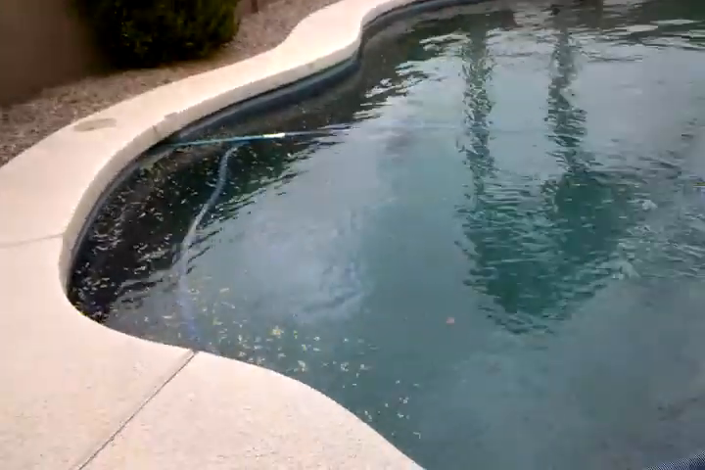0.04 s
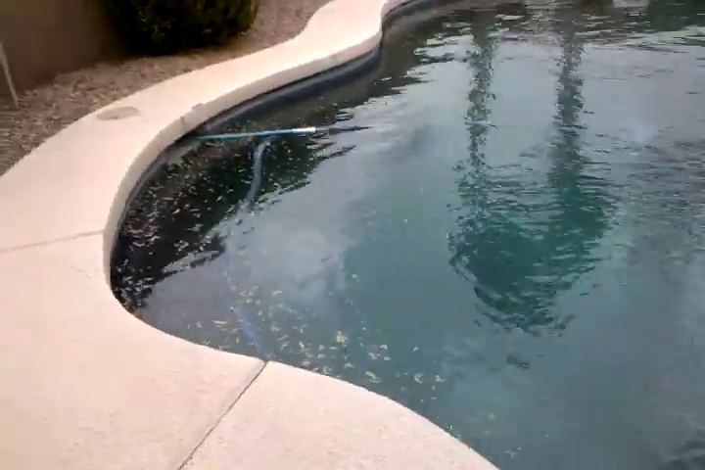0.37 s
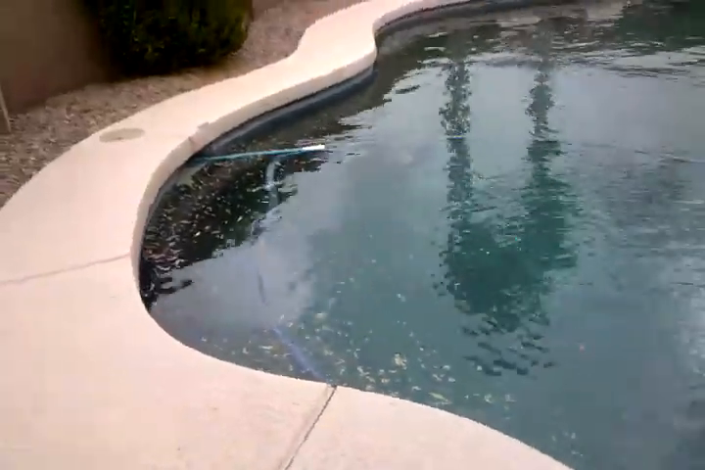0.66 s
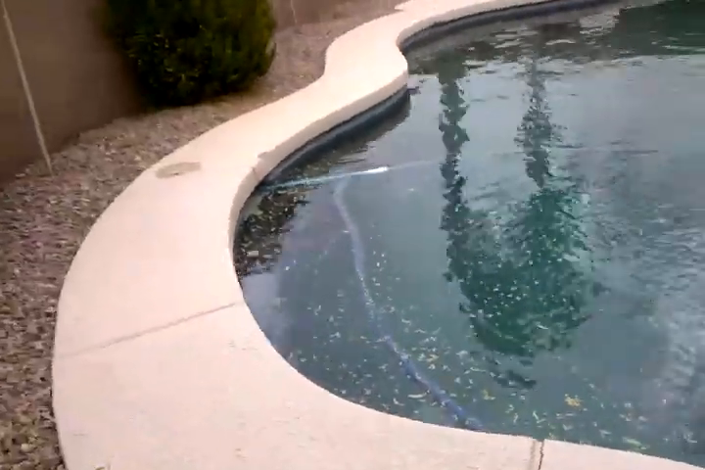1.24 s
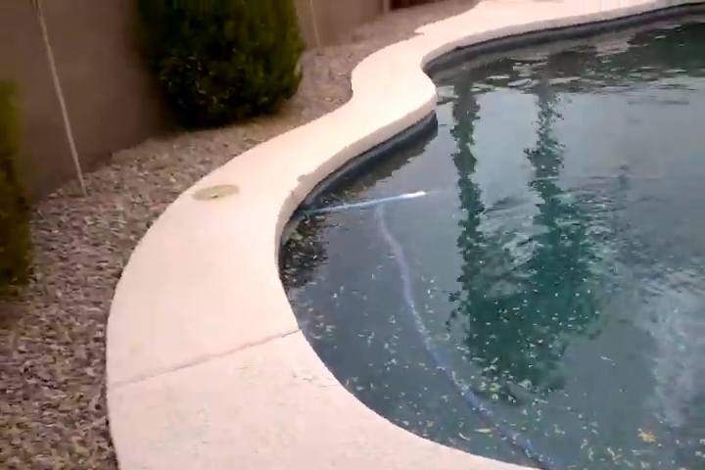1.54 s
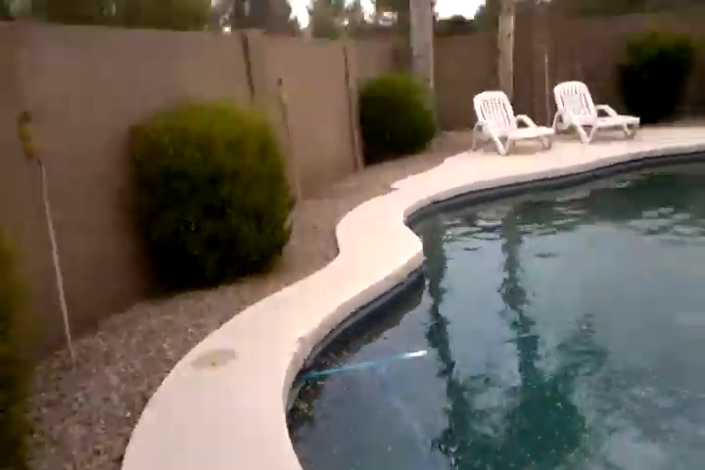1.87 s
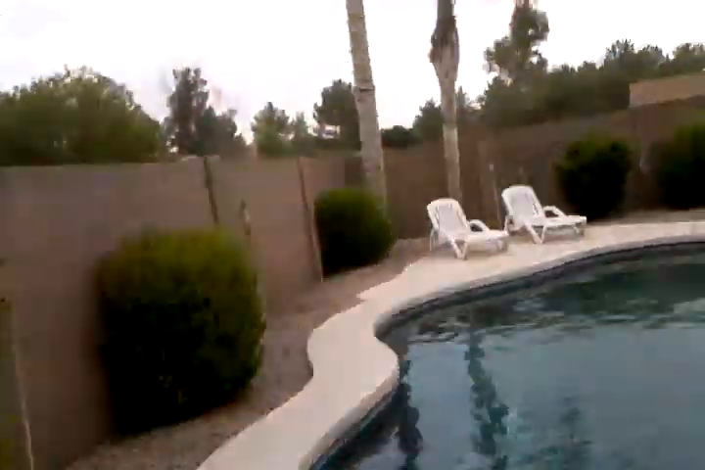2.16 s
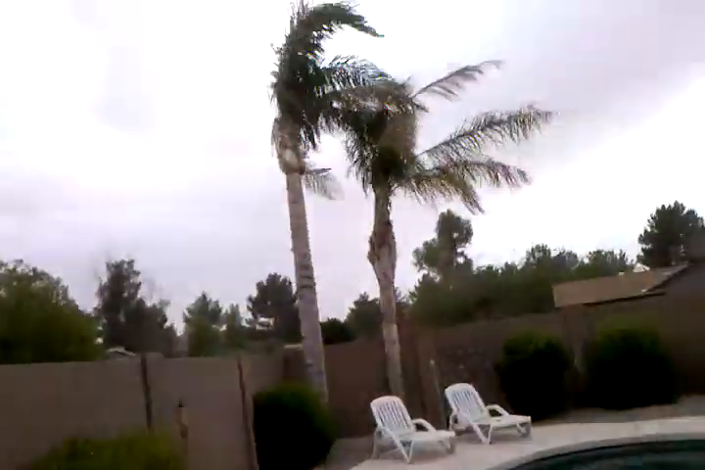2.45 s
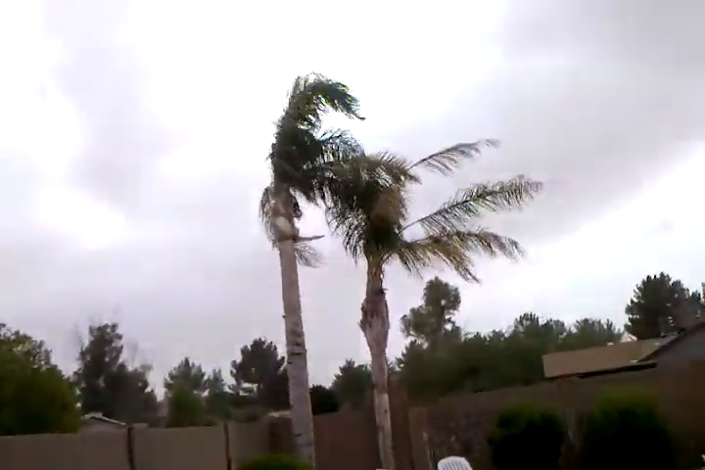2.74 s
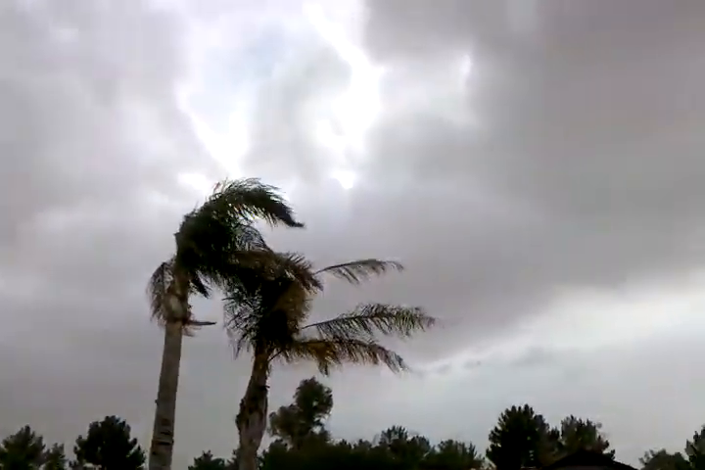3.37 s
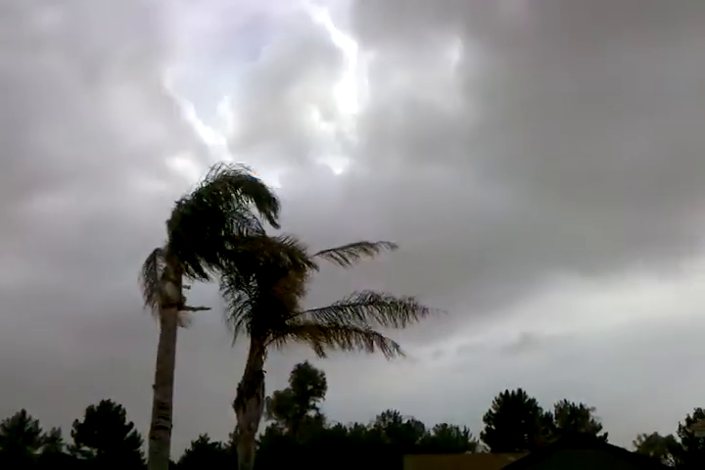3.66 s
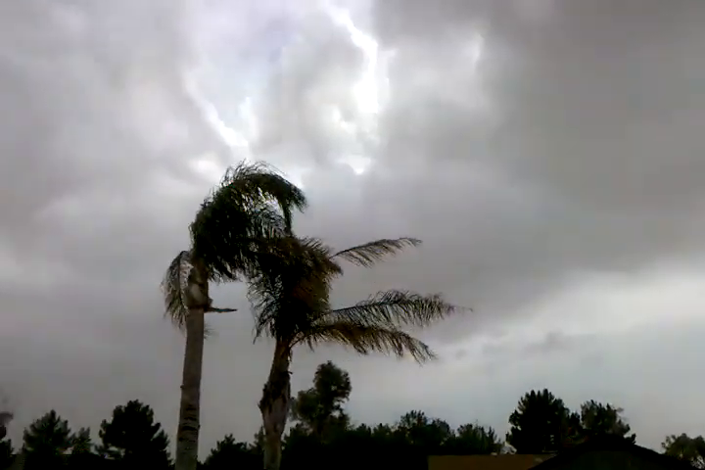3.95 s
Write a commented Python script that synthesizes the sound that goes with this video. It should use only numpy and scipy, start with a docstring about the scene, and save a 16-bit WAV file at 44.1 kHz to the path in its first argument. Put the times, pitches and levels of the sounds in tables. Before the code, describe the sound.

Strong wind blows steadily through backyard trees, a low roar under rustling leaves and hissing palm fronds. Dry debris taps and scrapes lightly on hard ground now and then, and gusts bump the microphone, more often in the second half.

```python
"""Strong wind pours through trees around a backyard pool: far crowns roar, leaves rustle, near fronds hiss.
Countless small sources add incoherently, so the foliage is heard as shaped noise that follows the gusts.
Now and then an eddy buffets the microphone with a low pressure pulse. Dry debris taps and scrapes on hard
ground, each contact exciting a damped resonance, and the yard walls return a short echo of it.
The sound is mono and narrow in band."""
import sys
import numpy as np
from scipy import signal
from scipy.fft import rfft, irfft
from scipy.io import wavfile
from scipy.ndimage import uniform_filter1d

SR = 44100
rng = np.random.default_rng(int(sys.argv[2]) if len(sys.argv) > 2 else 0)


def store_wav(level_fs):
    """Save 16-bit WAV to argv[1]."""
    pcm = np.round(np.clip(np.atleast_2d(level_fs), -1, 1) * 32767)
    wavfile.write(sys.argv[1], SR, pcm.T.astype(np.int16))


N = 176400

# Spectral density of the far crowns: f/Hz, level/dB
CROWN_SPECTRUM = [(22, -75.5), (32, -52.5), (50, -23), (80, -11.5), (125, -2), (170, -1.5), (260, -2),
                  (400, -4.5), (520, -5.3), (800, -4), (1200, -6), (1600, -10.5), (2500, -27.5),
                  (5000, -48.5)]
# Gusts in the crowns: t/s, level/dB
CROWN_GUSTS = [(0, -54), (0.549, -54.5), (.85, -54), (1.5, -57), (1.9, -56.5), (2.36, -57.5), (2.75, -55.5),
               (3.2, -55), (3.5, -56.5), (4, -57)]
def far_crowns():
    """Aerodynamic noise: turbulent flow through distant crowns makes a low roar."""
    return foliage(CROWN_SPECTRUM, CROWN_GUSTS, patchy_db=2.0, flutter_db=0.3)


# Spectral density of the leaves: f/Hz, level/dB
LEAF_SPECTRUM = [(300, -37), (900, -12.5), (1500, -3.5), (2000, 0), (2550, -0.5), (3100, -4), (4000, -7.5),
                 (5500, -11.5), (7000, -9.5), (9000, -34)]
# Gusts in the leaves: t/s, level/dB
LEAF_GUSTS = [(0, -53), (.6, -54), (1.299, -55), (1.8, -55), (2.36, -55), (2.75, -54.5), (3.15, -53),
              (3.499, -54.5), (4, -55.5)]
def leaves(ticks_per_s=350, tick_db=-66.5):
    """Superposition of small impacts: a continuous rustle, with single ticks where leaves touch."""
    touches = clicks(N, ticks_per_s, spread_db=2.0)
    ticks = unit_rms(colour(touches, LEAF_SPECTRUM) * envelope(LEAF_GUSTS))
    rustle = foliage(LEAF_SPECTRUM, LEAF_GUSTS, patchy_db=0.74, flutter_db=0.0)
    return rustle + amp(tick_db) * ticks


# Spectral density of the near fronds: f/Hz, level/dB
FROND_SPECTRUM = [(1000, -34.5), (2500, -2.5), (3500, -3), (4500, 2), (6000, 3.5), (6900, -1), (8000, -6)]
# Gusts in the fronds: t/s, level/dB
FROND_GUSTS = [(0, -55), (.55, -54), (.9, -55.5), (1.5, -54.5), (2.36, -55.5), (2.8, -55), (3.2, -53),
               (3.499, -56.5), (3.78, -59), (4, -62)]
def near_fronds():
    """Aerodynamic noise at close range: wind through fronds makes a fine hiss."""
    return foliage(FROND_SPECTRUM, FROND_GUSTS, patchy_db=0.54, flutter_db=0.14)


def foliage(spectrum, gusts, patchy_db, flutter_db, size=512):
    """Incoherent summation: many leaves give Gaussian noise, wavering in patches and as a whole."""
    hop = size // 4
    frames = N // hop + 5
    real, imag, patches = rng.standard_normal((3, frames, size // 2 + 1))
    patches = uniform_filter1d(patches, size=18, axis=0)  # smooth in time
    patches = unit_rms(uniform_filter1d(patches, size=6, axis=1))  # and in frequency
    flutter = unit_rms(uniform_filter1d(rng.standard_normal(frames), size=18))[:, None]
    spectra = (real + 1j * imag) * amp(patchy_db * patches + flutter_db * flutter)
    noise = signal.istft(spectra.T, nperseg=size, noverlap=size - hop)[1][:N]
    return envelope(gusts) * unit_rms(colour(noise, spectrum))


# Eddies at the microphone: centre t/s, Gaussian half-width/s, level/dB
EDDIES = [(.129, .01, -49), (0.952, .01, -43.5), (1.018, 0.033, -53.5), (1.174, 0.01, -50),
          (1.6, 0.12, -61.5), (2.358, 0.0039, -50.5), (2.71, 0.016, -53), (2.777, 0.012, -45),
          (2.85, 0.12, -54.5), (2.94, .012, -43.5), (2.97, 0.0087, -40), (3.031, 0.029, -47.5),
          (3.101, .035, -51), (3.495, 0.024, -58.5), (3.577, 0.019, -47.5), (3.613, 0.0094, -48.5),
          (3.67, 0.043, -56), (3.73, 0.015, -48), (3.764, 0.016, -45.5), (3.911, 0.0062, -47),
          (3.969, 0.11, -53.5)]
# Spectral density of an eddy: f/Hz, level/dB
EDDY_SPECTRUM = [(20, -60), (30, -43), (40, -24), (54, -13.5), (86, -2), (115, 1.5), (170, -1.5), (240, -9),
                 (350, -22), (700, -49), (2000, -74.5)]
def buffets(turbulence=.08, size=16384):
    """Hydrodynamic pressure: each passing eddy is a pressure drop inside a short swell of turbulence."""
    out, t = np.zeros(N), (np.arange(size) - size // 2) / SR
    for centre, half_width, db in EDDIES:
        swell = np.exp(-.5 * (t / half_width) ** 2)
        churn = turbulence * rng.standard_normal(size) * swell
        eddy = colour(churn - (t == 0), EDDY_SPECTRUM)  # the drop is a negative impulse
        eddy *= amp(db) * np.linalg.norm(swell) / np.linalg.norm(eddy)
        add(out, centre + t[0], eddy[centre + t >= 0])
    return out


# Debris impacts: t/s, level/dB over 3 ms, centre f/Hz, width/octaves, crumble decay/s
IMPACTS = [(.5800, -40, 3400, 0.81, 0.00044), (.5955, -45, 4500, 0.96, .0012),
           (.6000, -40.5, 1000, 2.1, 0.0011), (.6028, -39.5, 2800, 0.33, 0.0013),
           (.6032, -36.5, 6400, 0.15, .001), (0.6879, -38.5, 1140, 0.8, 0.0018),
           (.6950, -46, 1080, 0.59, .0006), (.7612, -44, 750, 1.3, 0.0013), (1.2188, -42, 560, 0.59, .0013),
           (1.2420, -53, 1400, 0.79, .0008), (1.263, -40, 3600, 1, 0.0004), (1.2682, -43, 4800, .5, .0005),
           (1.2818, -43, 1700, 1.4, 0.00089), (1.3278, -46, 6050, 0.36, 0.00066),
           (1.531, -48, 500, 0.46, .002), (1.8988, -41.5, 1100, 1.4, 0.0011),
           (2.6453, -43.5, 484, 0.46, 0.002), (2.6514, -41, 600, 1.2, 0.0011),
           (3.0382, -43.5, 2870, 0.26, .0014), (3.0827, -43, 1080, 0.55, 0.0012),
           (3.0865, -40, 595, 0.63, .0018), (3.1008, -52, 2400, 1.3, .001),
           (3.1072, -52, 1500, 1.6, 0.00052), (3.2445, -35, 985, 0.25, 0.0009),
           (3.2455, -38.5, 450, 1.7, 0.00084), (3.543, -45, 1580, 1.1, 0.0013),
           (3.7685, -40.5, 1730, .5, 0.001)]
def taps(grit=0.77, size=600):
    """Impact excitation: a hard contact and a brief gritty crumble ring a bit of debris."""
    out, t = np.zeros(N), np.arange(size) / SR
    for start, db, hz, octaves, decay in IMPACTS:
        crumble = grit * rng.standard_normal(size) * np.exp(-t / decay)
        tap = resonance((t == 0) + crumble, hz, octaves)
        add(out, start, amp(db) * tap * np.sqrt(.003 * SR) / np.linalg.norm(tap))
    return out


# Sliding debris: start t/s, duration/s, level/dB, centre f/Hz, width/octaves
SLIDES = [(0.592, 0.045, -51, 2800, 2), (0.693, 0.044, -59, 990, 1.1), (1.206, .125, -50.5, 650, 1.9),
          (1.896, 0.083, -54, 550, 0.81), (1.92, 0.063, -53, 2100, 1.3), (2.067, 0.022, -56.5, 1100, 1.4),
          (2.504, .01, -54, 3000, 0.39), (2.523, 0.011, -51, 3140, 0.43), (2.55, .012, -49.5, 2560, 0.47),
          (2.563, 0.015, -50.5, 3300, 0.24), (2.552, 0.081, -58, 537, 0.44), (3.03, 0.026, -50, 875, 1.7),
          (3.075, 0.053, -45.5, 2600, 0.6), (3.079, 0.07, -53, 380, 1.45), (3.218, 0.04, -52.5, 450, 0.95),
          (3.245, .045, -50.5, 350, 0.86), (3.541, 0.029, -52, 1800, 1.2)]
def scrapes(contacts_per_s=900, rise_share=0.067, size=SR // 4):
    """Sliding friction: a clump of small contacts swells quickly and fades, ringing the debris."""
    out = np.zeros(N)
    for start, duration, db, hz, octaves in SLIDES:
        contacts = unit_rms(clicks(size, contacts_per_s, spread_db=2.5))
        friction = contacts + 0.54 * rng.standard_normal(size)
        count = min(int(duration * SR), size)
        swell = np.interp(np.linspace(0, 1, count), [0, rise_share, 1], [.3, 1, .25])
        scrape = resonance(friction[:count] * swell, hz, octaves)
        add(out, start, amp(db) * scrape * np.sqrt(count) / np.linalg.norm(scrape))
    return out


def resonance(force, hz, octaves, skirt_db=-27.5, size=1024):
    """Damped resonance: a small dry object responds with one broad peak on a broadband skirt."""
    f = np.maximum(abs(np.fft.fftfreq(size, 1 / SR)), 1)
    peak = np.exp(-.5 * (np.log2(f / hz) / octaves) ** 2)
    passband = f ** 2 / (f ** 2 + 170 ** 2) / (1 + (f / 9000) ** 10)
    log_gain = np.log((peak + amp(skirt_db)) * passband + amp(-80))
    minimum_phase = np.exp(np.conj(signal.hilbert(log_gain)))  # no ringing before the contact
    return signal.fftconvolve(force, np.fft.ifft(minimum_phase).real[:size // 2])


def yard(direct, t60_s=.2, echo_db=-12.5):
    """Reflection: paving and walls add sparse echoes that decay exponentially."""
    t = np.arange(SR // 2) / SR
    tail = clicks(len(t), per_s=2000, spread_db=2) * amp(-60 * t / t60_s) * (t > .002)
    return direct + amp(echo_db) * signal.fftconvolve(direct, tail / np.linalg.norm(tail))[:N]


def clicks(count, per_s, spread_db):
    """Poisson process: independent impulses of uneven size and random sign."""
    occurs = rng.random(count) < per_s / SR
    strength = np.minimum(rng.exponential(1, count), 4)
    return occurs * rng.choice([-1, 1], count) * amp(spread_db * strength)


def colour(x, spectrum):
    """Linear filtering by a spectrum interpolated on a log-frequency axis."""
    hz, db = np.transpose(spectrum)
    f = np.fft.rfftfreq(len(x), 1 / SR)
    gain = amp(np.interp(np.log(f + 1), np.log(hz + 1), db))
    return irfft(rfft(x) * gain, len(x))


def envelope(curve):
    """Amplitude envelope: a level curve as a gain for each sample."""
    return amp(np.interp(np.arange(N) / SR, *np.transpose(curve)))


def amp(db):
    """Decibels to amplitude ratio."""
    return 10 ** (np.asarray(db) / 20)


def unit_rms(x):
    """Normalisation to rms 1."""
    return x / np.sqrt(np.mean(x ** 2) + 1e-20)


def add(mix, start_s, sound):
    """Superposition of a sound on the mix at its start time."""
    part = mix[max(round(start_s * SR), 0):][:len(sound)]
    part += sound[:len(part)]


def scene():
    """Linear superposition: trees, eddies and echoing debris sum at one microphone."""
    trees = far_crowns() + leaves() + near_fronds()
    mono = trees + buffets() + yard(taps() + scrapes())
    return np.array([mono, mono])


# Frequency response of the microphone: f/Hz, level/dB
MIC_RESPONSE = [(20, -0.5), (6850, -1.5), (7300, -9), (7900, -25), (8600, -25.5), (9100, -37.5)]
BAND_LIMIT_HZ = 9200
def record(dry):
    """Low-pass filtering: the microphone's treble roll-off, then a steep band limit."""
    heard = np.array([colour(channel, MIC_RESPONSE) for channel in dry])
    lowpass = signal.firwin(511, BAND_LIMIT_HZ, window=("kaiser", 9), fs=SR)
    return signal.oaconvolve(heard, lowpass[None], "same")


dry = scene()
out = record(dry)
store_wav(out)
```